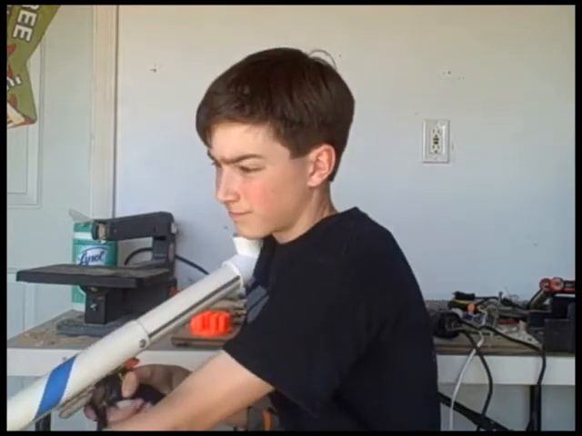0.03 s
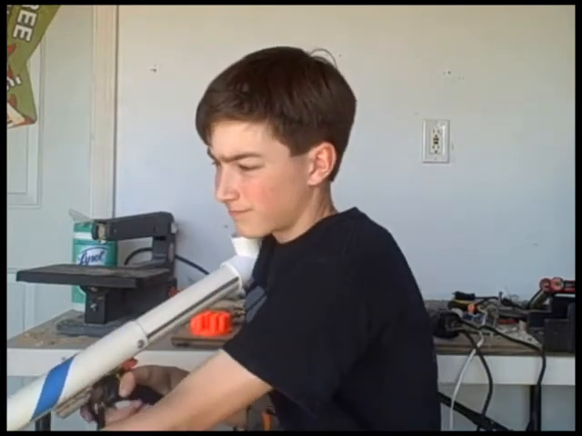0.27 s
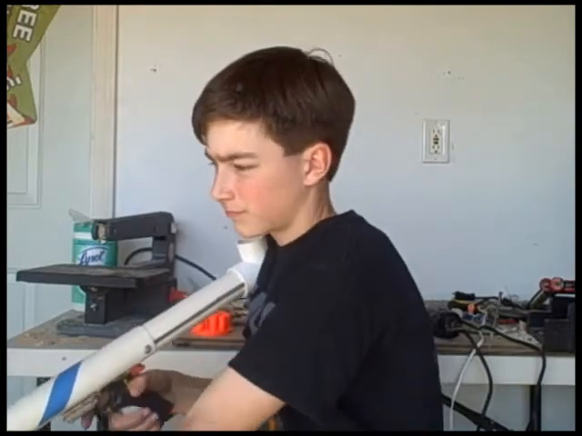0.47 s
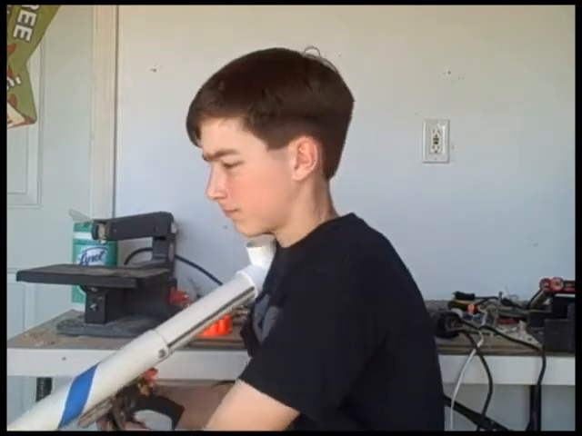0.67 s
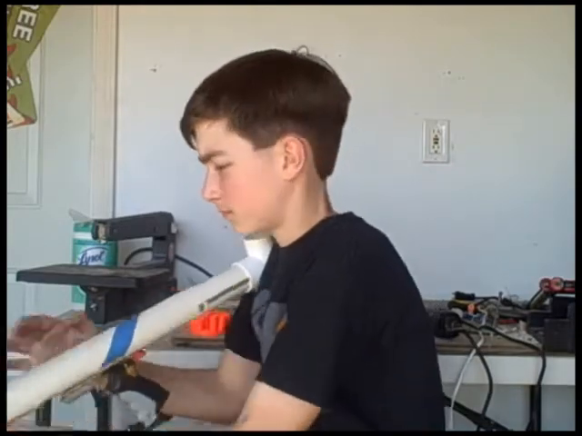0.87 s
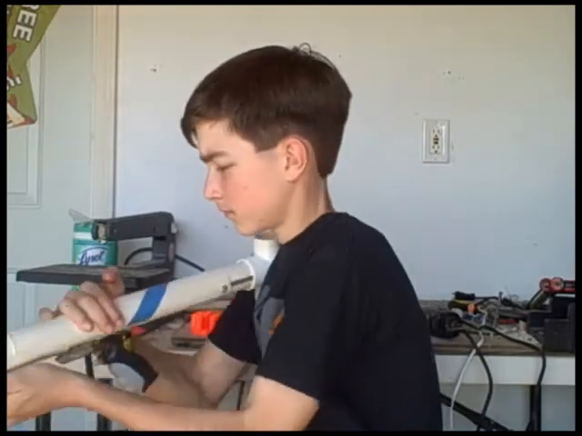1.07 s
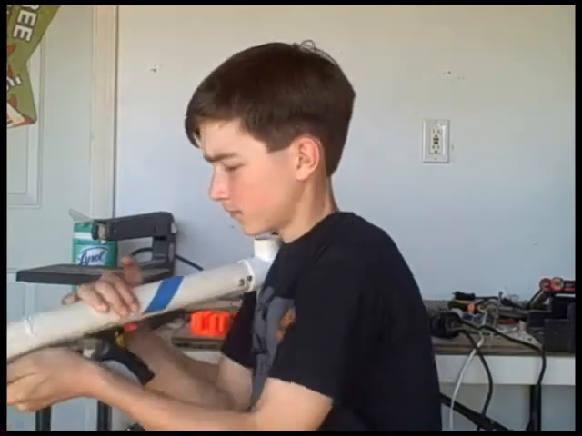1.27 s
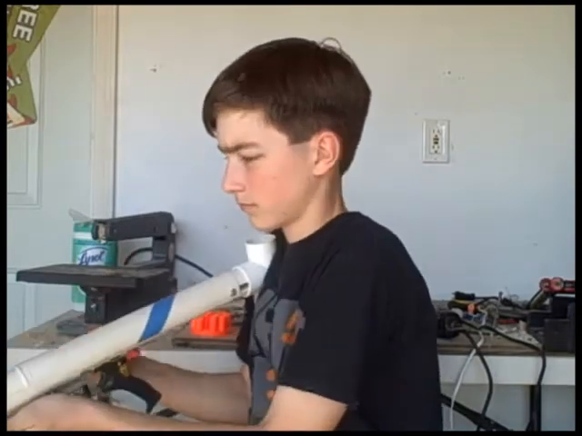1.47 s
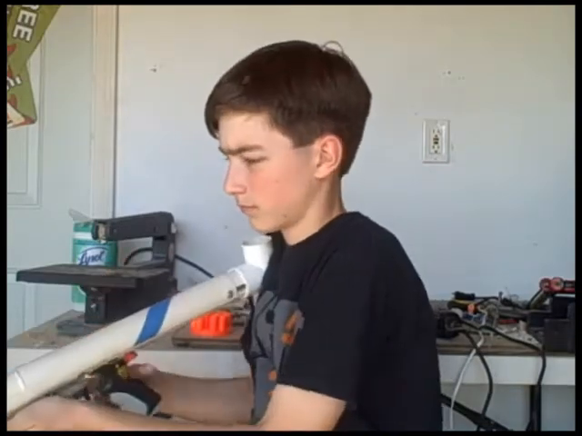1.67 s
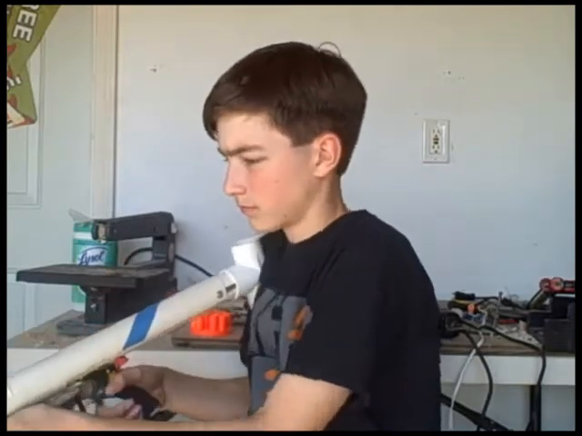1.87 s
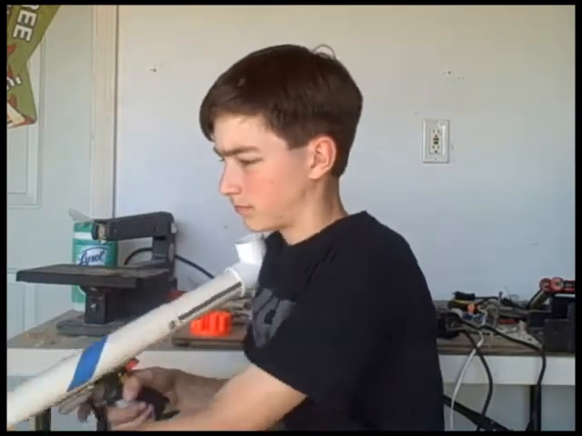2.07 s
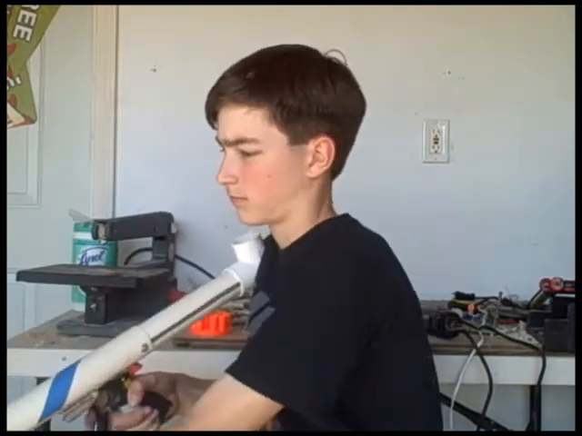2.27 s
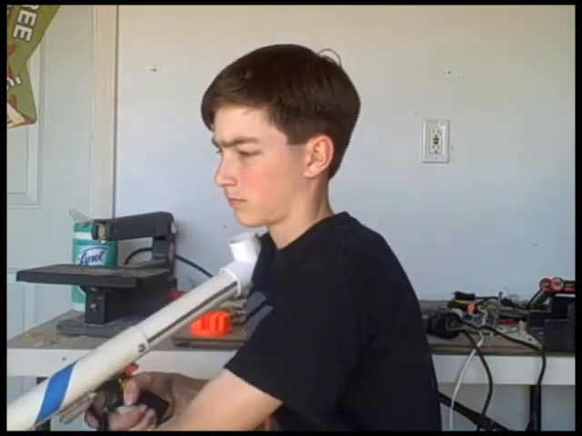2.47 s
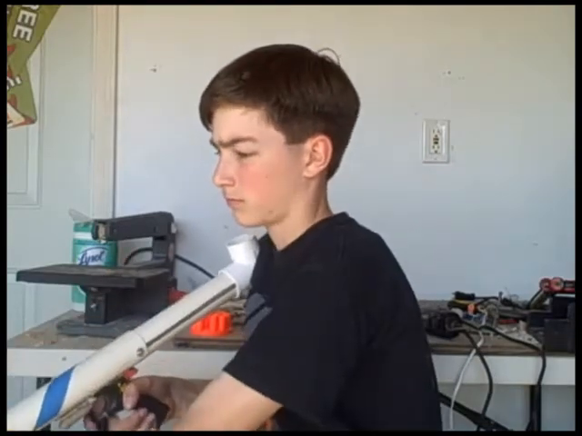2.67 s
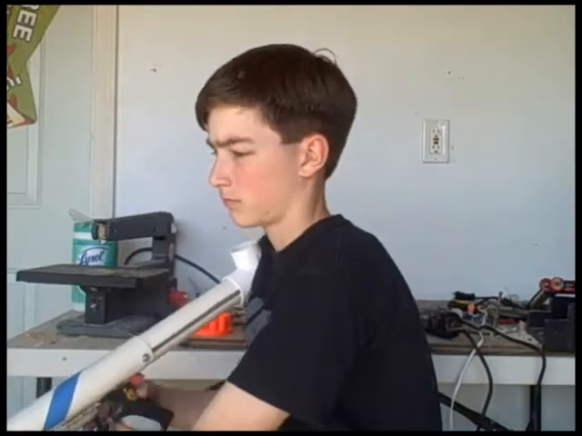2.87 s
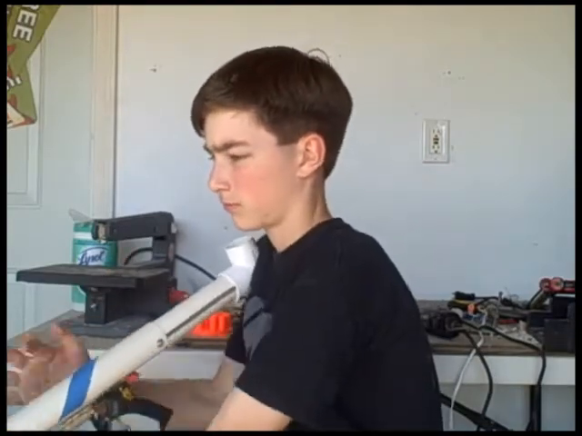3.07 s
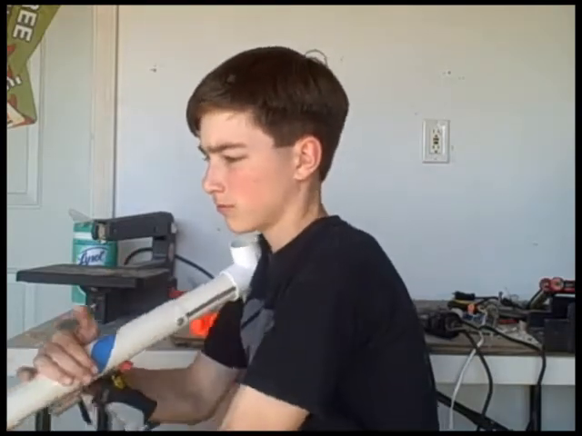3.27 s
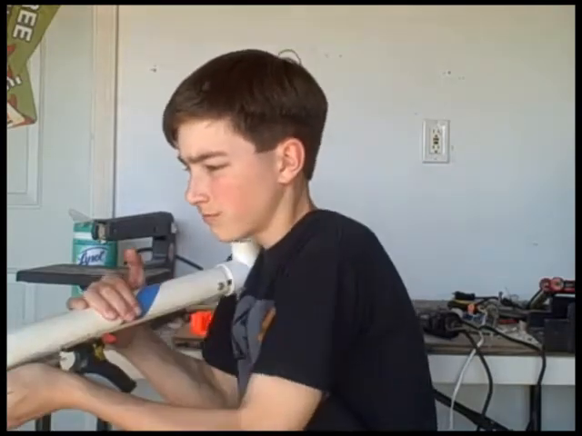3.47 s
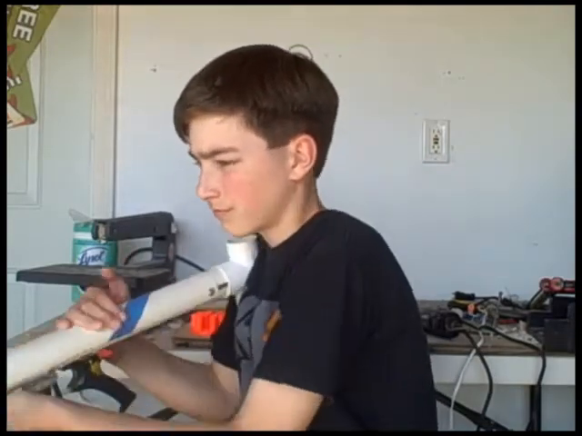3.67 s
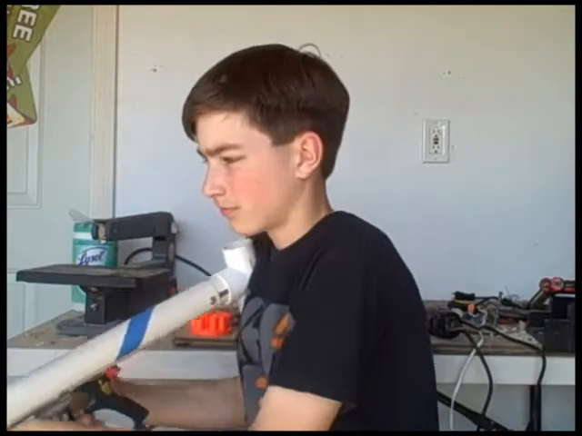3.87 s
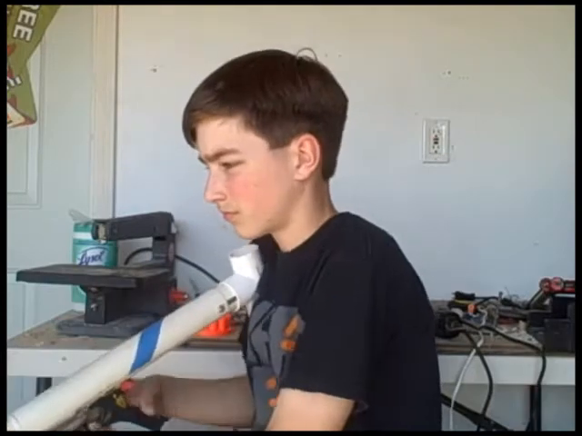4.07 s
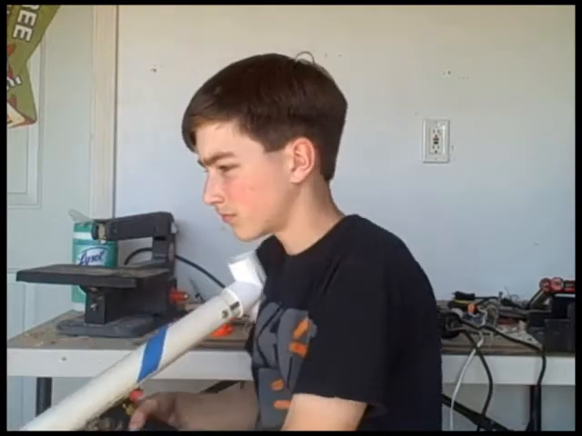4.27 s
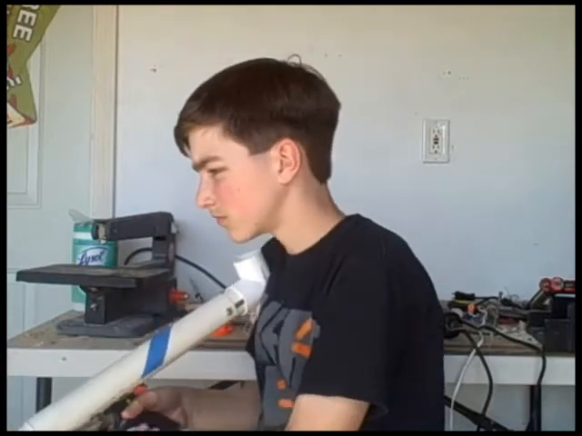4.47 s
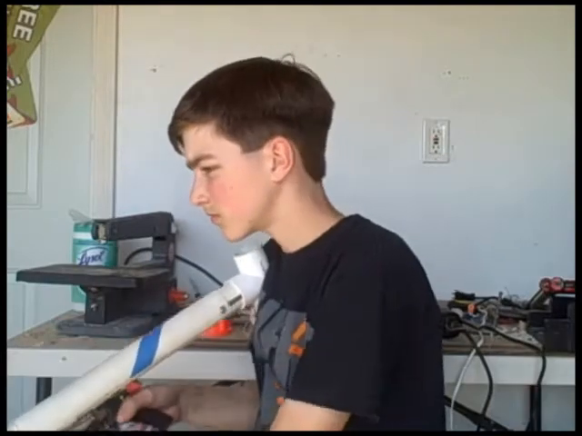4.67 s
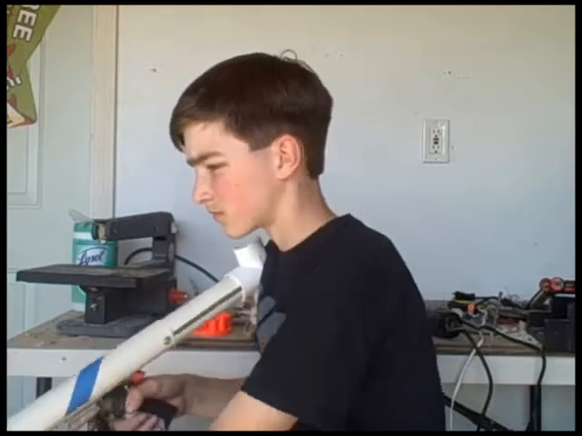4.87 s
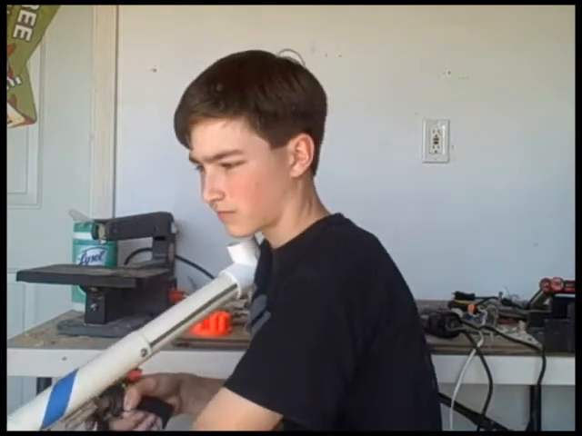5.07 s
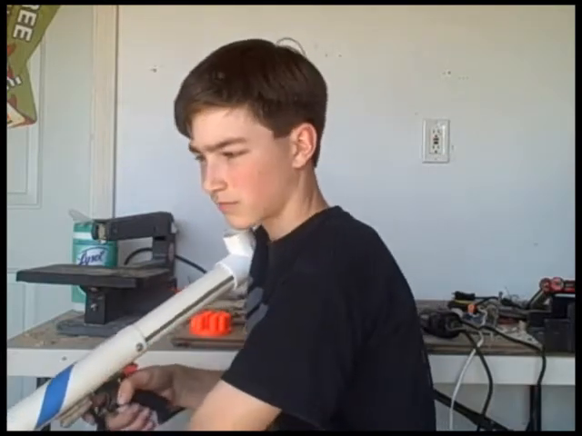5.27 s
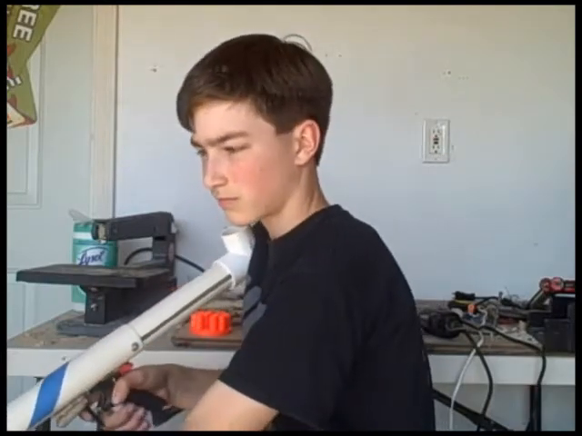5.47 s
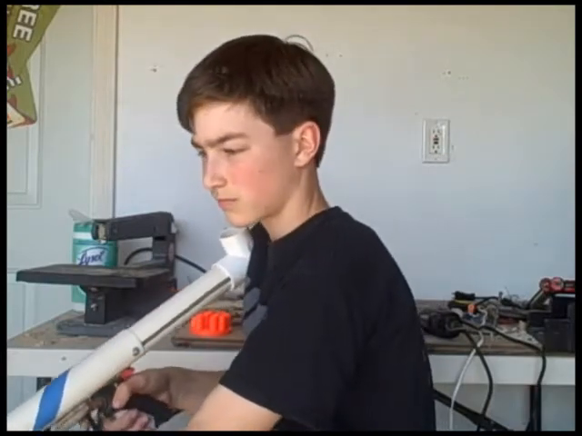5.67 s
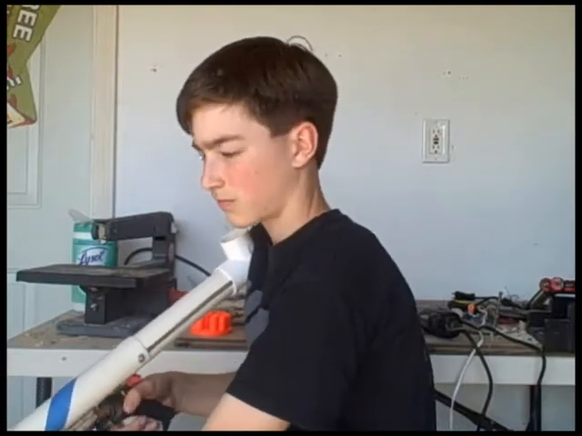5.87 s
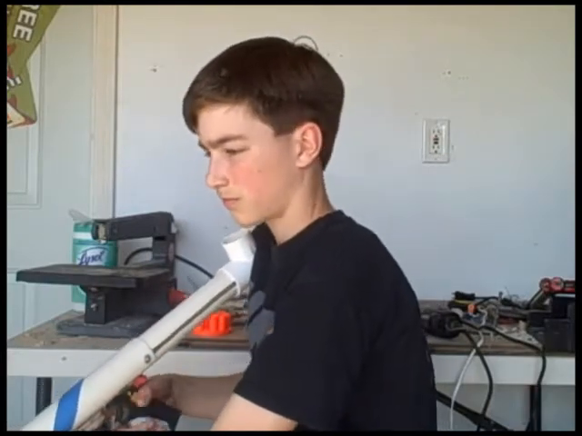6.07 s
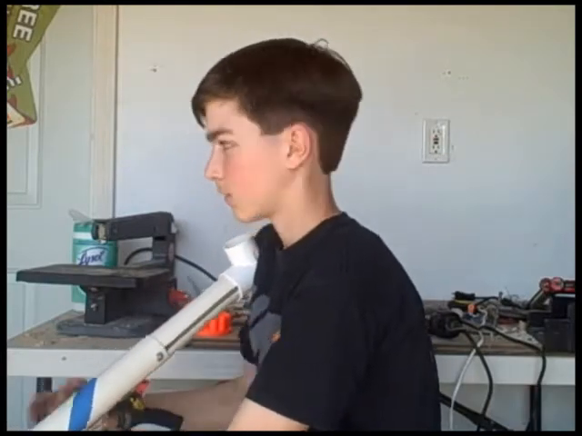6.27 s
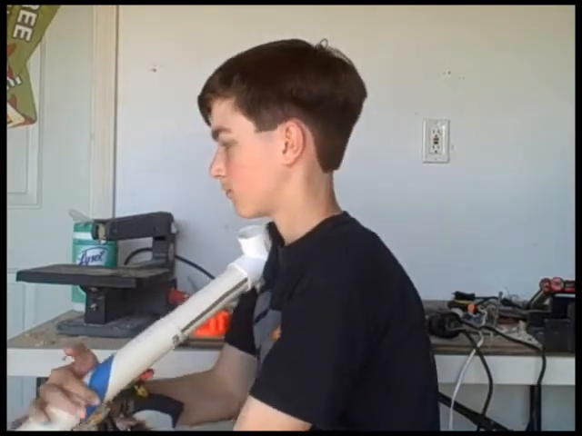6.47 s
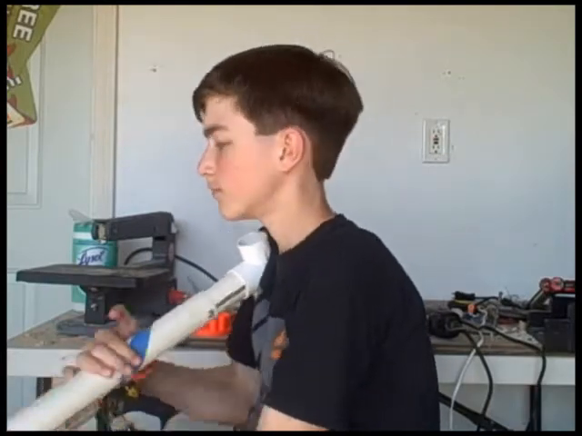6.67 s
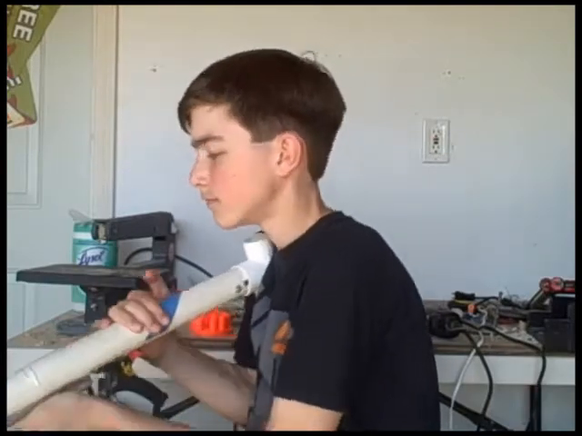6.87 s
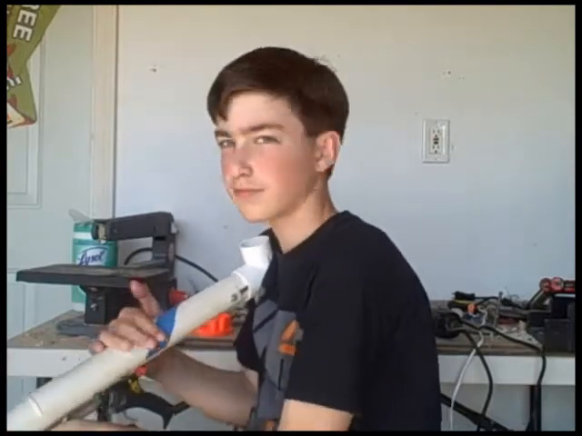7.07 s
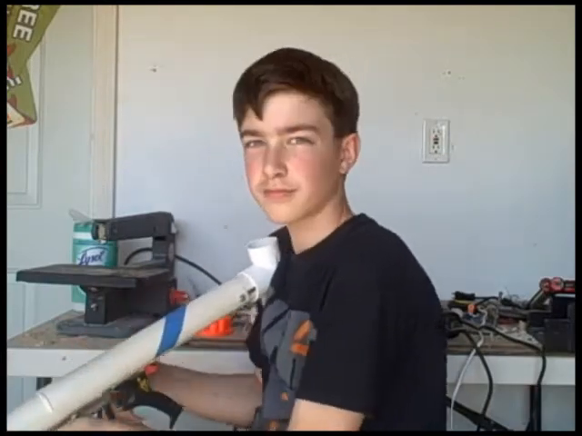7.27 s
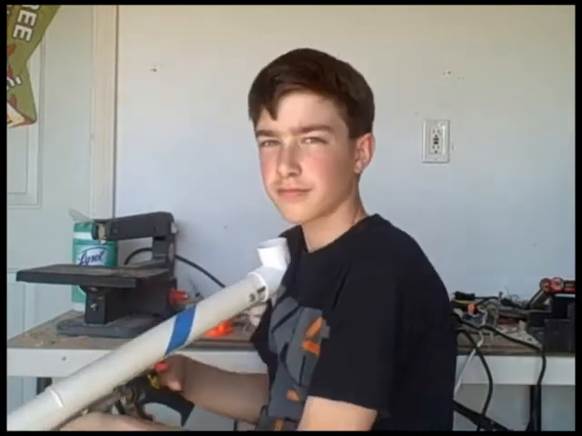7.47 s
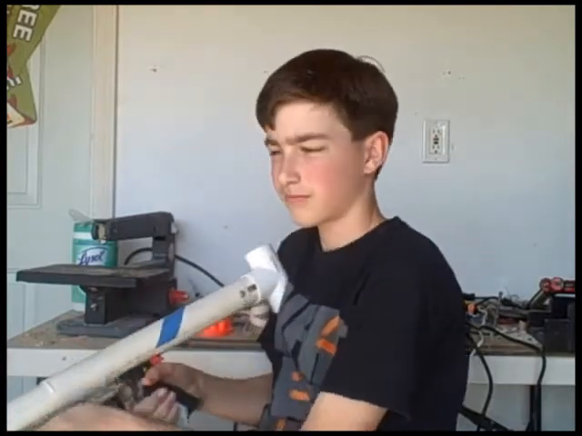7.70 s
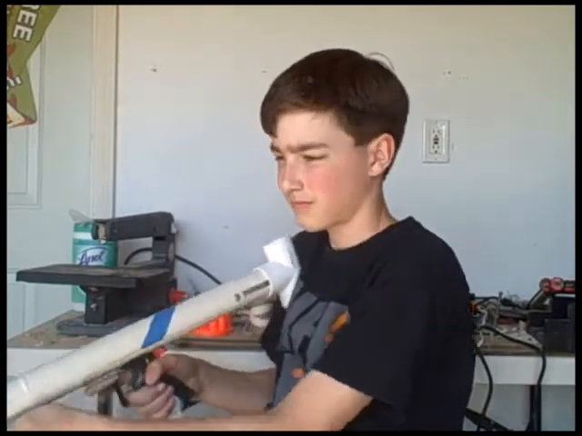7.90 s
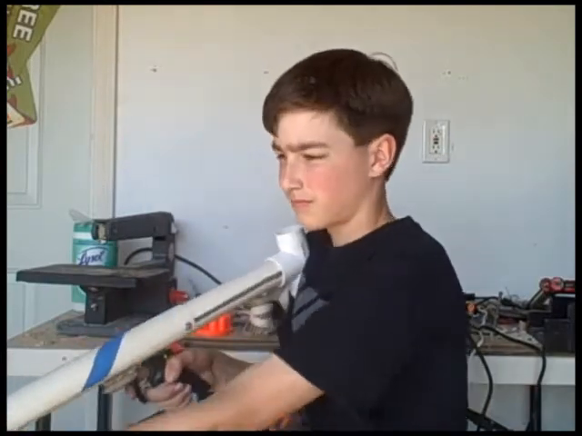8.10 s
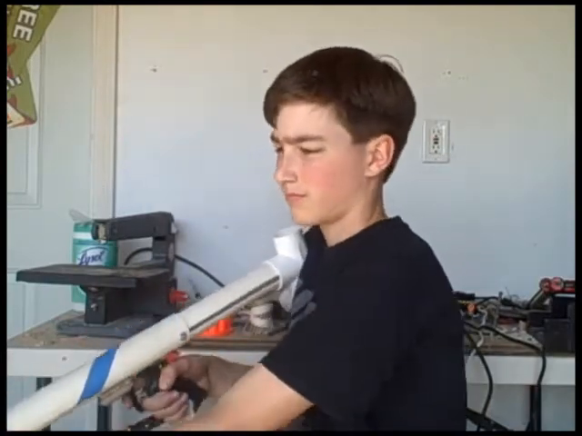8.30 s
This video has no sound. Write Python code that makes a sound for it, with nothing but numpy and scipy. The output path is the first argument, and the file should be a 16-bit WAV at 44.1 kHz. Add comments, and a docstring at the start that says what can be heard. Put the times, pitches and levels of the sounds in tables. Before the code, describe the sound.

Three sharp, thumping pops from a plastic pipe dart blaster, each followed by quieter sliding, clicking and a snap shut, over a faint distant engine.

```python
"""A homemade spring-and-plunger dart blaster of plastic pipe fires three times in a small workshop.
Each shot is a trigger tick, a rush of air and a blast, with the plunger thumping home. Then the breech
pops open, the slide scrapes back to its stop, a dart is tapped in, and the slide runs forward and snaps
shut. Each hit is a crunch of noise ringing the part it strikes. The last dart lands across the room,
and an engine drones far outside."""
import sys
import numpy as np
from scipy import signal
from scipy.fft import rfft, irfft, next_fast_len
from scipy.io import wavfile
from scipy.ndimage import uniform_filter1d

SR = 44100
rng = np.random.default_rng(int(sys.argv[2]) if len(sys.argv) > 2 else 0)


def materialize(psi):
    """Save the field psi as 16-bit PCM at rate SR to the path in sys.argv[1].

    A 1-D psi becomes a single channel; in a 2-D psi each row is a channel.
    """
    bounded = np.clip(np.atleast_2d(psi).T, -1, 1)
    quanta = np.round(bounded * 32767).astype(np.int16)
    wavfile.write(sys.argv[1], SR, quanta)


N = 367649
TIME = np.arange(N) / SR
AGE = TIME[:16384]  # seconds since a hit

# Far engine's firing rate: time_s, pitch_hz
ENGINE_PITCH = [(0, 92), (.9, 93), (2.4, 91), (3.1, 86.5), (3.55, 87), (4.2, 77.5), (8.34, 79)]
# Its harmonics: multiple, gain_db
ENGINE_HARMONICS = [(1, 1.5), (2, -20), (3, -16), (4, -29)]
# Its swells and fades: time_s, level_db
ENGINE_LEVEL = [(0, -46), (.55, -55.5), (.8, -42.5), (1, -40), (1.35, -51), (1.65, -42), (2.85, -45.5),
                (3.15, -60.5), (3.53, -47.5), (4.2, -66.5), (8, -69), (8.3, -50)]
# Low wash of the surroundings: freq_hz, gain_db
WASH_EQ = [(25, -12), (50, -12.5), (80, -4), (110, -6.5), (140, -11.5), (175, -10), (260, -20.5),
           (430, -23.5), (560, -20.5), (800, -27), (1050, -29.5), (1500, -37.5), (4000, -46), (12000, -55)]
# Its slow drift: time_s, level_db
WASH_LEVEL = [(0, -54), (4.9, -52.5), (5.95, -59.5), (7.2, -57), (7.8, -53)]
# A hand or sleeve slides along the pipe: start_s, length_s, level_db
RUBS = [(0.814, 0.036, -40), (0.895, 0.17, -58.5), (2.965, 0.63, -55.5), (4.302, 0.089, -65),
        (6.165, 0.21, -60.5), (6.456, 0.044, -54.5), (6.58, 0.27, -59)]
# Tone of that rustle: freq_hz, gain_db
RUB_EQ = [(100, -8.5), (500, -0.5), (1400, 1), (2500, -3.5), (4000, -6.5), (7000, -7), (12000, -12)]
# Shots: trigger_s, blast_s, blast_db, rush_db, blast_length_s, tilt_db_per_octave, chirp_db
SHOTS = [(.158, 0.1767, -7, -20, 0.016, -0.65, -33.5), (2.587, 2.609, -10.5, -20, 0.0093, 1.8, -24),
         (5.498, 5.5207, -5.5, -19.5, 0.018, 0, -23.5)]
# Tone of the blast and trigger: freq_hz, gain_db
BLAST_EQ = [(30, -11), (90, -12), (160, -7.5), (400, 1), (700, -6.5), (1050, -0.5), (1700, -2.5),
            (3000, -4), (6000, -9.5), (12000, -18)]
# The barrel's ring: pitch_hz, width_hz, lift_db
BARREL_MODES = [(954, 58, 7), (1080, 25, 2.5), (1155, 20, 5.5), (1964, 11, 1), (2510, 46, 3), (2880, 96, 5),
                (4953, 36, -1.5), (6930, 16, 6)]
# Hiss of rushing air and scraping pipe: freq_hz, gain_db
HISS_EQ = [(100, -17.5), (350, -4), (800, -2), (2200, -1.5), (4000, -6), (7000, -9), (12000, -11)]
# Plunger hits and rebounds: start_s, level_db, tilt_db_per_octave, contact_s
THUMPS = [(.178, -20, 3, 0.0021), (.191, -16, -0.5, 0.0018), (.222, -16.5, 0.17, 0.0019),
          (.236, -20, 1.5, 0.0022), (2.613, -16, -3.5, 0.0056), (2.634, -20, -4.5, 0.0032),
          (2.652, -15.5, 0.5, 0.0042), (2.665, -12.5, -2, 0.0035), (5.540, -9, -1, 0.0071),
          (5.548, -17, 1, 0.0053), (5.562, -16.5, 0.5, 0.0018), (5.579, -22, 1, 0.002)]
# Tone of a thump: freq_hz, gain_db
THUMP_EQ = [(30, -21), (90, -17), (160, -5.5), (250, -7), (430, -3.5), (700, -7.5), (1200, -11),
            (3000, -12.5), (12000, -30)]
# The plunger tube's ring: pitch_hz, width_hz, lift_db
TUBE_MODES = [(222, 17, 7), (251, 16, 10), (318, 19, 9), (392, 21, 9), (460, 35, 5), (524, 20, 6)]
# Catch and loose fittings: start_s, level_db, tilt_db_per_octave, contact_s
CLICKS = [(.6765, -56.5, -5, .001), (.686, -54.5, 0, .002), (.7224, -51.5, -1, .001),
          (.777, -38, -0.5, 0.0038), (1.0012, -46.5, 1, 0.002), (1.3464, -53.5, 0.5, .001),
          (1.9526, -58, -2, 0.0029), (2.9308, -55, -1, .002), (2.947, -51.5, -1, .0046),
          (3.1718, -42, -0.5, .0044), (4.1306, -54.5, -0.2, .003), (4.2404, -57.5, -1, 0.0012),
          (4.2898, -50.5, 0, 0.00056), (4.599, -52, 3, .001), (4.637, -49, 1, 0.0013),
          (5.2765, -53, 0.6, 0.0009), (6.1565, -59, 1, 0.0031), (6.4444, -53, 1, .004),
          (6.7636, -55, 1, .002), (6.9836, -51, 1.5, .001), (7.5284, -50.5, -0.5, 0.0041),
          (7.5578, -57, 3.5, 0.0008)]
# Tone of a click: freq_hz, gain_db
CLICK_EQ = [(100, -21), (500, -15), (1000, -6.5), (1400, -4.5), (2800, -4.5), (4500, -5.5), (7000, -4),
            (12000, -10.5)]
# The catch's ring: pitch_hz, width_hz, lift_db
CATCH_MODES = [(1500, 52, 7.5), (2410, 130, 6), (3650, 540, 6.5), (4570, 94, 3.5)]
# The breech opens: start_s, level_db, tilt_db_per_octave, contact_s
POPS = [(.7877, -24, -1.06, 0.004), (3.0555, -32.5, -4, 0.011), (6.358, -45.5, -4.5, 0.0087)]
# Tone of a pop: freq_hz, gain_db
POP_EQ = [(100, -18), (220, -22), (340, -7), (480, -19), (800, -11), (1300, -6.5), (2500, 2), (3700, -4.5),
          (6000, -3.5), (12000, -11.5)]
# Air ringing in the barrel: pitch_hz, width_hz, lift_db
BORE_MODES = [(323, 24, 17.5), (1260, 98, 11), (2420, 55, 1.5), (2990, 36, 9), (4770, 47, 7.5)]
# The slide goes back: stop_s, travel_s, scrape_db, clack_db, contact_s
PUSHES = [(1.1934, .07, -46, -30, 0.0048), (3.5059, .11, -46, -30.5, 0.007),
          (6.8211, .145, -45, -33, 0.0054)]
# Squeaky edge of pipe on pipe: pitch_hz, width_hz, lift_db
SCRAPE_MODES = [(2480, 60, 6.5), (3050, 110, 4.5), (5530, 78, 9), (6010, 90, 8), (7760, 180, 7)]
# Tone of the slide's clack: freq_hz, gain_db
CLACK_EQ = [(100, -13), (250, -11.5), (420, 6.5), (620, 0.5), (1000, -1), (2300, 1.5), (4000, -6),
            (7000, -6), (12000, -16.5)]
# The slide's ring, with one notch: pitch_hz, width_hz, lift_db
SLIDE_MODES = [(450, 17, 2.5), (516, 10, 10), (734, 11, 6.5), (1550, 31, -12.5), (2520, 31, 5.5)]
# Knocks that ring the pipe: mostly hand and grip bumping it, plus a short ringing squeal as the third push sets
# off at 6.678 s: start_s, level_db, tilt_db_per_octave, contact_s
KNOCKS = [(1.371, -44, 0.82, 0.0071), (1.379, -38, 0.35, 0.0061), (3.686, -38, 0.37, 0.0072),
          (6.678, -51.5, -0.6, 0.011), (7.022, -42, 1, 0.0098)]
# Tone of a knock: freq_hz, gain_db
KNOCK_EQ = [(100, -12), (330, 1.5), (600, -4), (900, -3), (1400, -1), (1800, -10), (2400, -9.5),
            (3200, -14), (7000, -17), (12000, -21)]
# The pipe wall's ring: pitch_hz, width_hz, lift_db
PIPE_MODES = [(507, 65, 6.5), (713, 27, 8.5), (1260, 68, 7.5), (2330, 260, 5.5)]
# A dart is seated: start_s, level_db, tilt_db_per_octave, contact_s
TAPS = [(1.763, -45.5, 2, .001), (1.8293, -59.5, 3, .002), (3.178, -44.5, -3.5, 0.0016),
        (3.309, -47.5, -0.3, 0.0039), (6.3241, -54.5, -5.5, 0.0029), (6.5546, -46.5, -2.5, 0.0045),
        (7.4062, -58, -0.5, 0.0016), (7.6207, -44, 0.68, 0.00077), (7.694, -58, -0.5, 0.0074)]
# Tone of a tap: freq_hz, gain_db
TAP_EQ = [(100, -24), (500, -5), (1000, -6), (1400, 3.5), (2400, 0), (3600, -7), (7000, -13),
          (12000, -14.5)]
# The dart socket's ring: pitch_hz, width_hz, lift_db
SOCKET_MODES = [(1470, 9.2, 9.5), (2060, 15, 7), (2590, 130, 5), (5300, 24, 11), (5800, 34, 6)]
# The slide runs shut: start_s, snap_s, scrape_db, squeak_db, clack_db, snap_db, snap_contact_s
CLOSINGS = [(2.0364, 2.2085, -44, -41, -42, -25, 0.0049), (4.766, 5.002, -49, -34, -40, -29, 0.0043),
            (7.932, 8.160, -46.5, -50, -38.5, -25.5, .0045)]
# Tone of the snap: freq_hz, gain_db
SNAP_EQ = [(100, -29), (300, -11.5), (700, -9.5), (1400, -1), (2400, -4.5), (4300, -3), (6000, -7),
           (8500, -10), (12000, -17.5)]
# The breech coupler's ring: pitch_hz, width_hz, lift_db
COUPLER_MODES = [(2143, 60, 4), (2692, 70, 4), (3600, 120, 4), (4285, 90, 6), (4818, 60, 4)]
# The last dart lands and bounces: start_s, level_db, tilt_db_per_octave, contact_s
LANDINGS = [(5.738, -46, 0.0032, 0.0013), (5.745, -42, 0, 0.0019)]
# Tone of the landing: freq_hz, gain_db
LANDING_EQ = [(100, -24), (330, -5), (620, 3.5), (1000, -2.5), (1500, -3.5), (2500, -18), (6000, -27),
              (12000, -24)]
# The floor's ring: pitch_hz, width_hz, lift_db
FLOOR_MODES = [(724, 82, 6), (913, 99, 8)]
# Time the workshop's tail takes to fall 60 dB: freq_hz, decay_s
ROOM_DECAY = [(60, 0.23), (250, 0.18), (1000, 0.2), (3000, 0.23), (7000, 0.17), (12000, 0.2)]


def amp(db):
    """Decibels to gain."""
    return 10 ** (np.asarray(db) / 20)


def curve(rows, at):
    """Straight lines through the rows of a table."""
    return np.interp(at, *np.transpose(rows))


def over_hz(points, hz):
    """Straight lines on a log-frequency axis."""
    freqs, values = np.transpose(points)
    return np.interp(np.log(hz + 1), np.log(freqs), values)


def steady(x, db):
    """Set the rms level of a sustained sound."""
    return x * amp(db) / np.std(x)


def brief(x, db):
    """Set the level of a transient, its energy counted over 30 ms."""
    return x * amp(db) * np.sqrt(.03 * SR / np.sum(x ** 2))


def add(out, start_s, x):
    """Mix x in at start_s."""
    i = max(int(start_s * SR), 0)
    out[i:i + len(x)] += x[:N - i]


def causal(x, gain_at):
    """Minimum-phase EQ: it rings only after the hit."""
    n = 2 * next_fast_len(len(x) // 2 + 2048)
    cepstrum = irfft(np.log(gain_at(np.arange(n // 2 + 1) * SR / n)))
    cepstrum[1:n // 2] *= 2
    cepstrum[n // 2 + 1:] = 0
    return irfft(rfft(x, n) * np.exp(rfft(cepstrum)))[:len(x)]


def body(x, eq, modes=(), tilt_db=0):
    """A broad EQ, tilted per octave, with ringing modes standing out of it."""
    def gain_at(hz):
        lift = 1 + sum((amp(db) ** 2 - 1) / (1 + (2 * (hz - pitch) / width) ** 2)
                       for pitch, width, db in modes)
        tone_db = over_hz(eq, hz) + tilt_db * np.log2(np.maximum(hz, 200))
        return amp(tone_db) * np.sqrt(np.maximum(lift, .1))
    return causal(x, gain_at)


def whiten(x, bins=32):
    """Spread the energy of a short noise evenly over frequency."""
    power = uniform_filter1d(uniform_filter1d(np.abs(rfft(x)) ** 2, bins), bins) + 1e-9
    return causal(x, lambda hz: np.interp(hz, np.linspace(0, SR / 2, len(power)), power) ** -.5)


def burst(envelope):
    """White noise under an envelope."""
    return whiten(rng.standard_normal(len(AGE)) * envelope)


def wobble(rate_hz, n=N):
    """Smooth random modulation with a spread near 1."""
    hold = int(SR / rate_hz)
    steps = np.repeat(rng.standard_normal(n // hold + 2), hold)
    return steady(uniform_filter1d(steps, hold), 0)[:n]


def friction(n, grain_db, patchy_db):
    """Dense tiny slips of uneven size that come in patches."""
    return rng.standard_normal(n) * amp(grain_db * wobble(1500, n) + patchy_db * wobble(60, n))


def impacts(hits, eq, modes, grind_db=-30, grind_s=0.01):
    """The parts grind as they meet; then a short crunch rings the struck part."""
    out, lead = np.zeros(N), int(.03 * SR)
    for start, db, tilt_db, contact in hits:
        crunch = np.pad(brief(burst(np.exp(-AGE / contact)), 0), (lead, 0))
        grind = rng.standard_normal(lead) * np.exp(-AGE[:lead][::-1] / grind_s)
        crunch[:lead] += brief(grind, grind_db)
        add(out, start - lead / SR, brief(body(crunch, eq, modes, tilt_db), db))
    return out


def far_engine():
    """A distant drone swells and fades as its firing rate sags."""
    phase = 2 * np.pi * np.cumsum(curve(ENGINE_PITCH, TIME)) / SR
    drone = sum(amp(db + 1.1 * wobble(4.3)) * np.sin(k * phase) for k, db in ENGINE_HARMONICS)
    return steady(drone, 0) * amp(curve(ENGINE_LEVEL, TIME))


def ambience(hum_hz=110.7, hum_db=-62.5):
    """A bed of faint, fluttering hum and the low wash of the surroundings."""
    hum = steady(np.sin(2 * np.pi * hum_hz * TIME) * amp(2 * wobble(23)), hum_db)
    wash = steady(body(rng.standard_normal(N), WASH_EQ), 0)
    return hum + wash * amp(curve(WASH_LEVEL, TIME) + 0.27 * wobble(3.7))


def hand_rustle(grip_db=-70.5, attack_s=0.021, release_s=.03):
    """Skin and cloth rustle faintly on the pipe; each rub swells, holds and dies away."""
    pressure = amp(grip_db)
    for start, length, db in RUBS:
        attack = np.clip(1 + (TIME - start) / attack_s, 0, 1)
        release = np.exp(-np.maximum(TIME - start - length, 0) / release_s)
        pressure = pressure + amp(db) * attack * release
    return steady(body(friction(N, grain_db=2.5, patchy_db=2.5), RUB_EQ), 0) * pressure


def shots(trigger_db=-35, rush_hz=6000, chirp_hz=800, buzz_db=-20, buzz_decay_s=0.049):
    """The trigger lets go, air rushes ahead of the plunger, and the dart leaves with a chirp and blast."""
    out = np.zeros(N)
    for trigger, blast, blast_db, rush_db, length, tilt_db, chirp_db in SHOTS:
        tick = body(burst(np.exp(-AGE / 0.017)), BLAST_EQ, BARREL_MODES)
        add(out, trigger, brief(tick, trigger_db))
        # leaking air hisses louder as the plunger gathers speed, until the dart is out
        rush = burst((1 - np.exp(-AGE / .005)) ** 6 * (AGE < blast - trigger))
        add(out, trigger, brief(body(rush, HISS_EQ, [(rush_hz, 900, 10)], tilt_db=3), rush_db))
        # the air column ahead of the dart shortens, so its pitch shoots up
        travel = np.linspace(0, 1, int(.007 * SR))
        pitch = chirp_hz / (1 - .85 * travel)
        chirp = np.sin(2 * np.pi * np.cumsum(pitch) / SR) * travel * np.sqrt(1 - travel)
        add(out, blast - len(travel) / SR, brief(chirp, chirp_db))
        muzzle_crack = 0.15 * np.exp(-AGE / 0.0015)
        tube_emptying = np.exp(-(AGE / length) ** 2)
        spring_buzz = amp(buzz_db) * np.exp(-AGE / buzz_decay_s)
        bang = burst(muzzle_crack + tube_emptying + spring_buzz)
        add(out, blast, brief(body(bang, BLAST_EQ, BARREL_MODES, tilt_db), blast_db))
    return out


def plunger_thumps():
    """The plunger hits the end of its tube and rebounds."""
    return impacts(THUMPS, THUMP_EQ, TUBE_MODES)


def fitting_clicks():
    """The catch and loose fittings click, light and bright."""
    return impacts(CLICKS, CLICK_EQ, CATCH_MODES)


def breech_pops():
    """The breech pops open and the air in the barrel rings."""
    return impacts(POPS, POP_EQ, BORE_MODES, grind_db=-16)


def sing(hz, width_hz):
    """A resonance kept ringing by friction, uneven in strength and phase."""
    phase, n = 2 * np.pi * np.cumsum(hz) / SR, len(hz)
    return steady(wobble(width_hz, n) * np.sin(phase) + wobble(width_hz, n) * np.cos(phase), 0)


def slide_scrape(length_s, first_hz, last_hz, db, column_db, swell_db=0, squeak_db=-90):
    """Pipe scrapes in pipe, squeaking at first; the enclosed air glides in pitch as its length changes."""
    n = int(length_s * SR)
    scrape = steady(body(friction(n, grain_db=4, patchy_db=3), HISS_EQ, SCRAPE_MODES), 0)
    column = sing(1 / np.linspace(1 / first_hz, 1 / last_hz, n), width_hz=200)
    squeak = sum(sing(np.full(n, hz), width_hz=300) for hz in (5660, 5900)) / 2
    squeak *= amp(squeak_db) * np.exp(-TIME[:n] / .03)
    slide = (scrape + amp(column_db) * column) * amp(np.linspace(db - swell_db, db, n))
    return (slide + squeak) * signal.windows.tukey(n, .1)


def catch_tick(clack_s, clack_db, lead_s=0.017, tilt_db=0.6, contact_s=0.0014):
    """The light hit of the catch just ahead of a clack."""
    return clack_s - lead_s, clack_db - 9, tilt_db, contact_s


def slide_back(first_hz=846, last_hz=653, rebound_s=0.015):
    """The scrape builds and the lengthening air column falls; the slide clacks on its stop and bounces."""
    out, hits = np.zeros(N), []
    for stop, travel, scrape_db, clack_db, contact in PUSHES:
        scrape = slide_scrape(travel, first_hz, last_hz, scrape_db, column_db=-9.5, swell_db=6)
        add(out, stop - travel, scrape)
        clack = (stop, clack_db, .1, contact)
        rebound = (stop + rebound_s, clack_db - 9, -5.5, 0.004)  # softer and duller
        hits += [catch_tick(stop, clack_db), clack, rebound]
    return out + impacts(hits, CLACK_EQ, SLIDE_MODES, grind_db=-7, grind_s=0.012)


def pipe_knocks():
    """Hand and grip bump the pipe and ring its wall; a short squeal rings out as the third push sets off."""
    return impacts(KNOCKS, KNOCK_EQ, PIPE_MODES, grind_db=-11)


def dart_taps():
    """Hollow taps as the dart is seated in the barrel."""
    return impacts(TAPS, TAP_EQ, SOCKET_MODES)


def slide_forward(first_hz=752, last_hz=1300, lead_s=.012, tilt_db=-0.15, contact_s=0.0099):
    """The slide breaks free with a clack and squeak, then scrapes home; the shortening air column rises."""
    out, hits = np.zeros(N), []
    for start, snap, scrape_db, squeak_db, clack_db, _, _ in CLOSINGS:
        begin = start - lead_s
        scrape = slide_scrape(snap - begin, first_hz, last_hz, scrape_db,
                              column_db=-10, squeak_db=squeak_db)
        add(out, begin, scrape)
        hits += [catch_tick(start, clack_db), (start, clack_db, tilt_db, contact_s)]
    return out + impacts(hits, CLACK_EQ, SLIDE_MODES, grind_db=-7.5)


def breech_snaps(tilt_db=0.45):
    """The breech snaps shut at the end of each forward run, ringing the coupler."""
    hits = [(snap, db, tilt_db, contact) for _, snap, _, _, _, db, contact in CLOSINGS]
    return impacts(hits, SNAP_EQ, COUPLER_MODES, grind_db=-32)


def dart_landing():
    """The last dart hits the floor across the room and bounces."""
    return impacts(LANDINGS, LANDING_EQ, FLOOR_MODES)


def workshop(x, wet_db, build_s=0.00037, wall_s=.008, wall_gain=.25):
    """Direct sound, a slap off the near wall and a short, dense tail."""
    noise = rfft(rng.standard_normal(len(AGE)))
    hz = np.linspace(0, SR / 2, len(noise))
    octave = np.round(np.log2(np.maximum(hz, 64)))
    tail = sum(irfft(noise * (octave == k)) * 10 ** (-3 * AGE / over_hz(ROOM_DECAY, 2 ** k))
               for k in np.unique(octave))
    response = tail * (1 - np.exp(-AGE / build_s))
    response *= amp(wet_db) / np.linalg.norm(response)
    response[0] += 1
    response[int(wall_s * SR)] += wall_gain
    response = whiten(response, bins=14)
    return signal.fftconvolve(x, response / np.linalg.norm(response))[:N]


def scene():
    """The mono mix: each group of parts gets its own amount of room, over the engine and ambience."""
    firing = workshop(shots(), wet_db=1) + workshop(plunger_thumps(), wet_db=-2.5)
    landing = workshop(dart_landing(), wet_db=-3.5)
    opening = workshop(breech_pops(), wet_db=-1)
    pumping = slide_back() + slide_forward() + pipe_knocks() + hand_rustle()
    loading = fitting_clicks() + dart_taps()
    closing = workshop(breech_snaps(), wet_db=0.5)
    handling = workshop(pumping, wet_db=-1.5) + workshop(loading, wet_db=2.5)
    return (firing + landing + opening + closing + handling + far_engine() + ambience())[None]


def record(dry, top_hz=12000, ceiling=.65):
    """The microphone flattens the peaks of the shots; the top end is cut steeply."""
    high_cut = signal.ellip(10, .2, 80, top_hz, fs=SR, output="sos")
    heard = signal.sosfilt(high_cut, dry)
    limited = heard / (1 + (heard / ceiling) ** 6) ** (1 / 6)
    return signal.sosfilt(high_cut, limited)


dry = scene()
out = record(dry)
materialize(out)
```